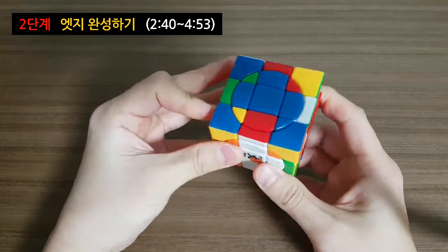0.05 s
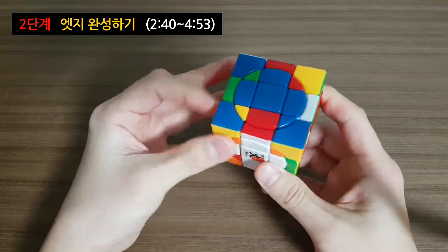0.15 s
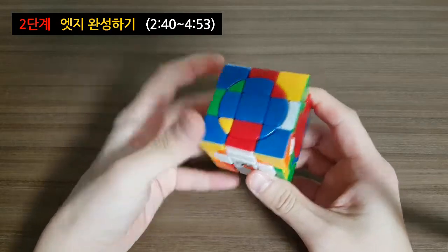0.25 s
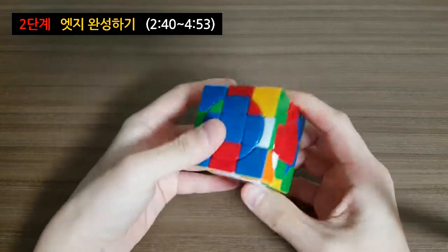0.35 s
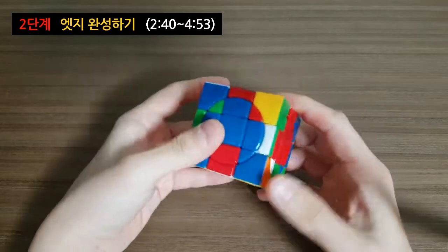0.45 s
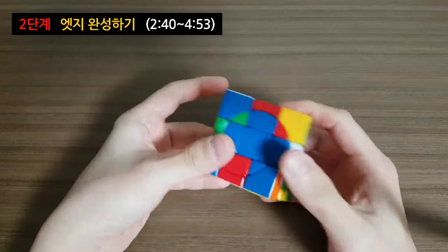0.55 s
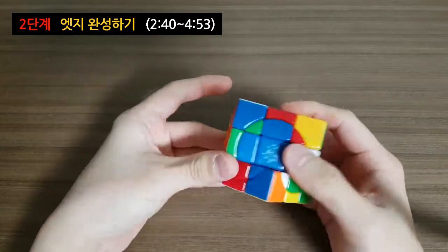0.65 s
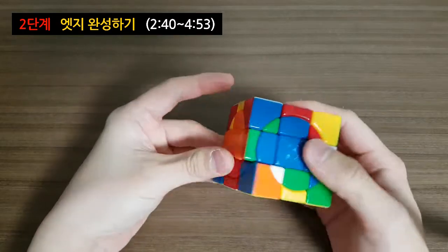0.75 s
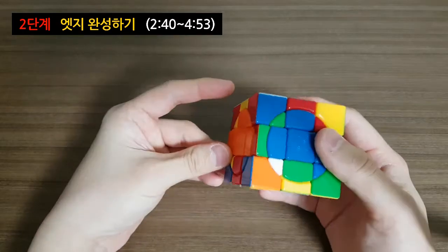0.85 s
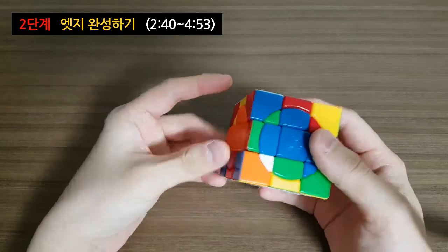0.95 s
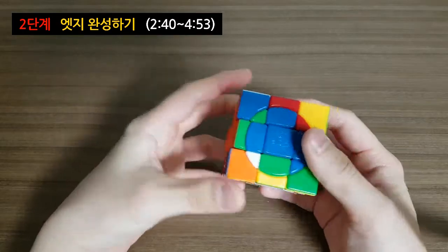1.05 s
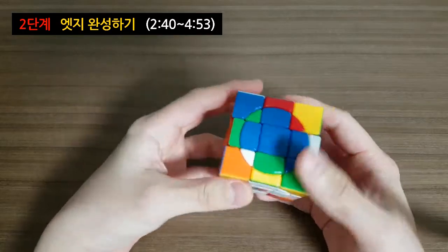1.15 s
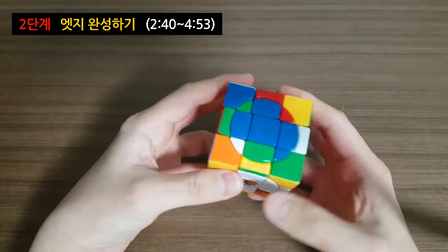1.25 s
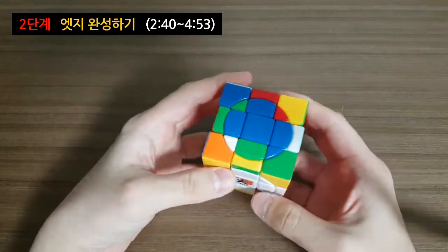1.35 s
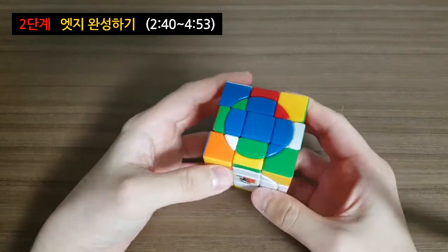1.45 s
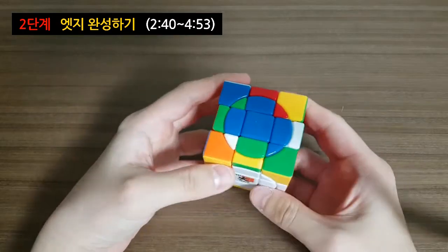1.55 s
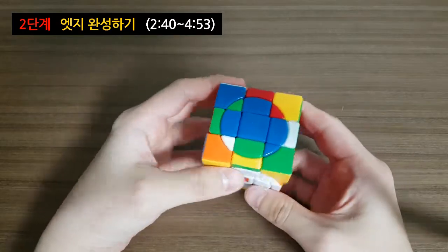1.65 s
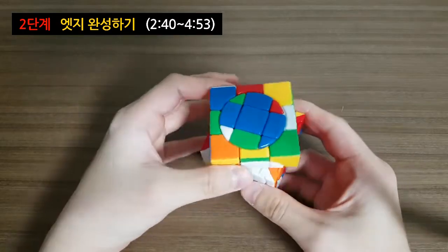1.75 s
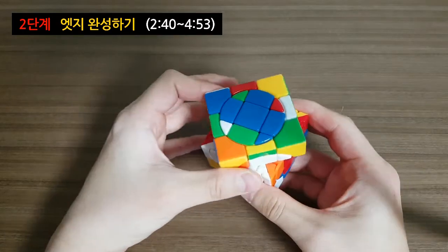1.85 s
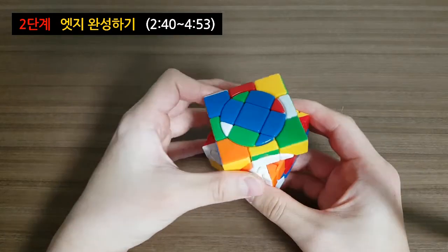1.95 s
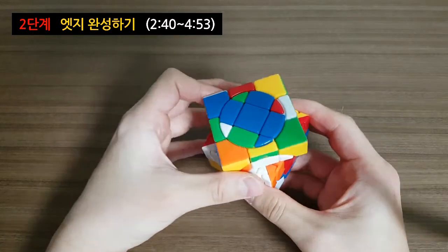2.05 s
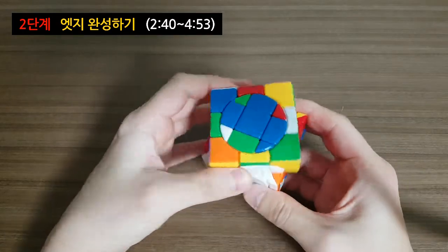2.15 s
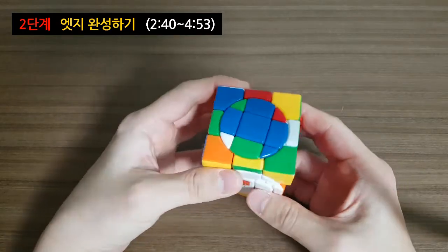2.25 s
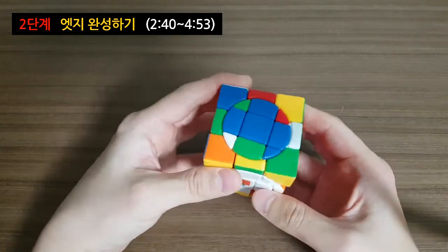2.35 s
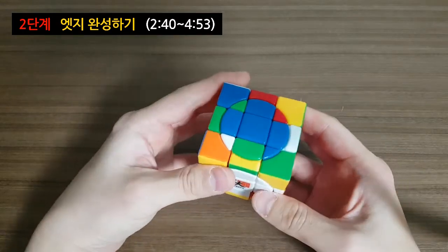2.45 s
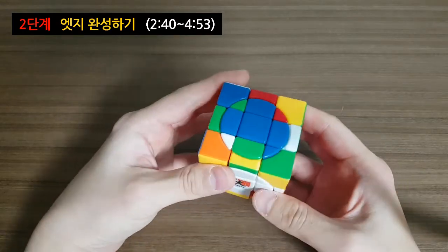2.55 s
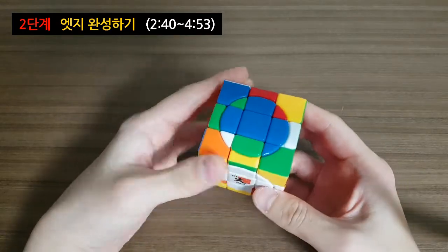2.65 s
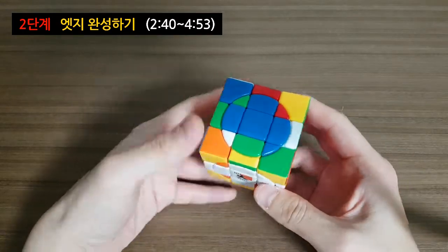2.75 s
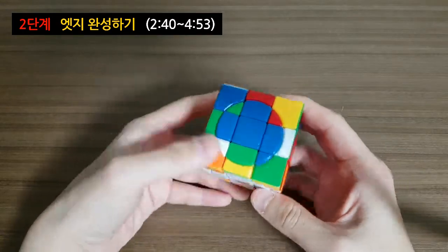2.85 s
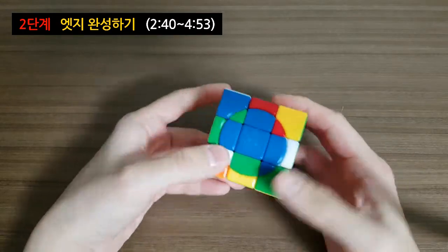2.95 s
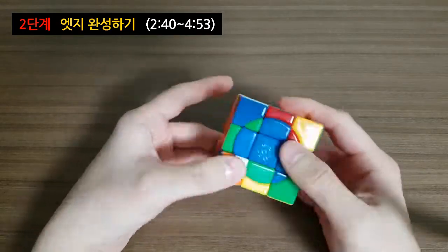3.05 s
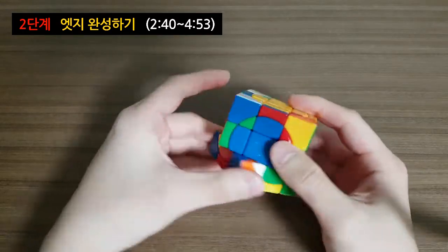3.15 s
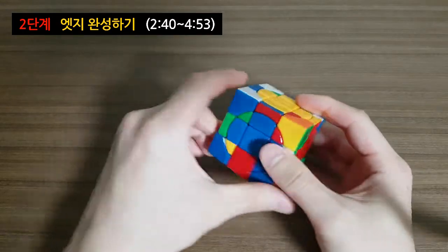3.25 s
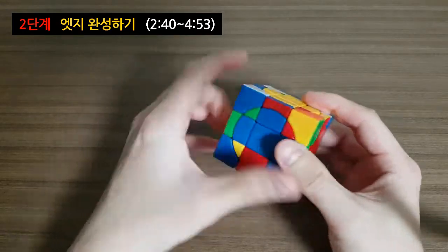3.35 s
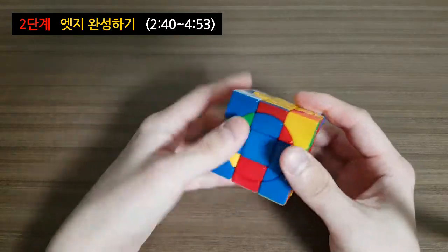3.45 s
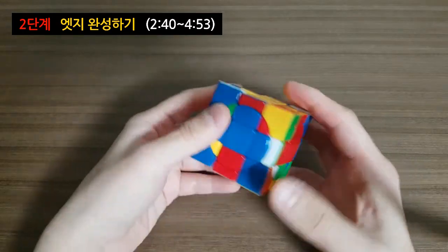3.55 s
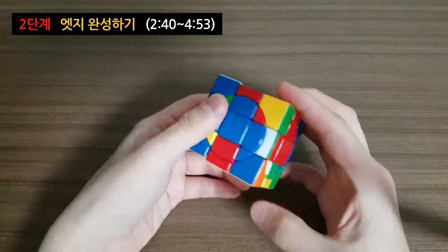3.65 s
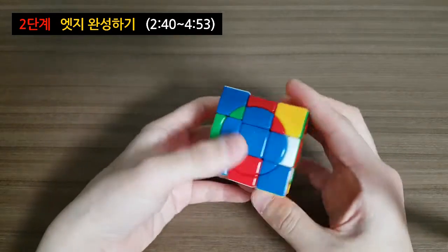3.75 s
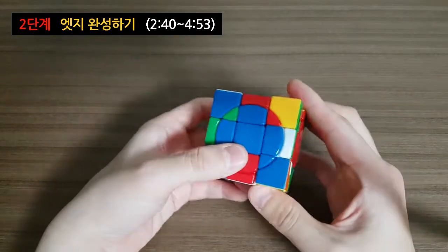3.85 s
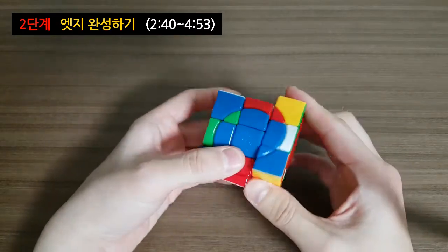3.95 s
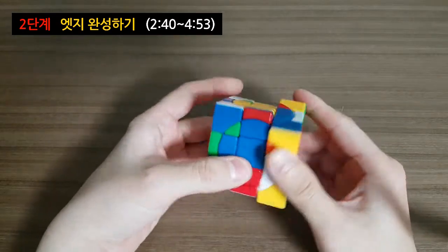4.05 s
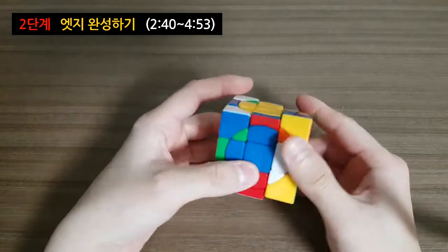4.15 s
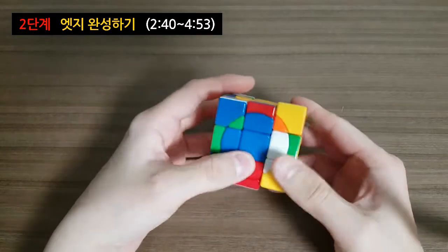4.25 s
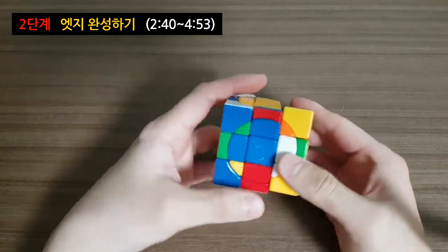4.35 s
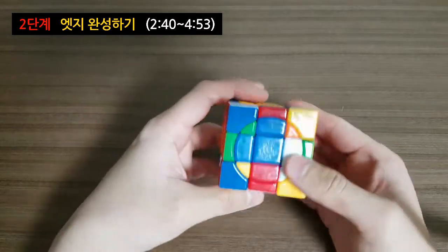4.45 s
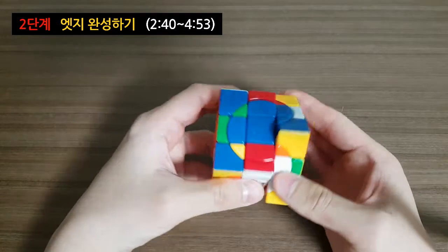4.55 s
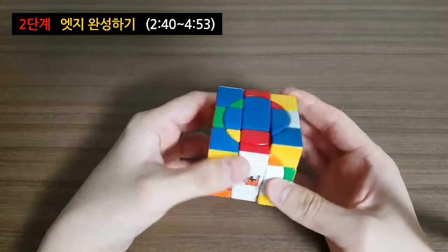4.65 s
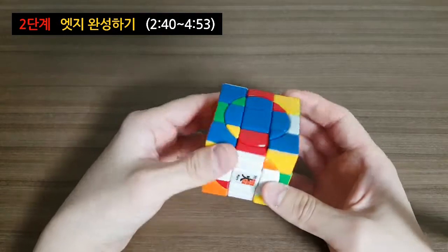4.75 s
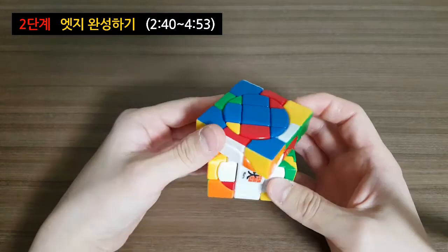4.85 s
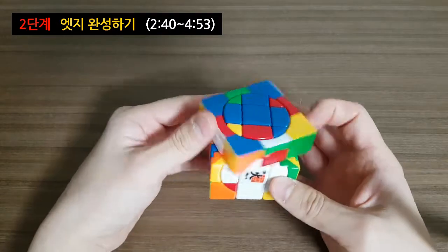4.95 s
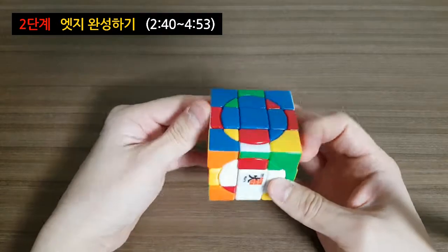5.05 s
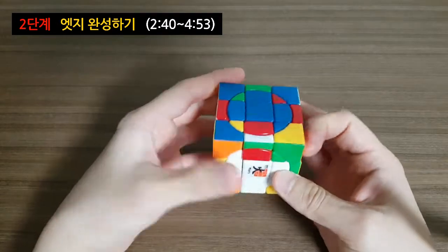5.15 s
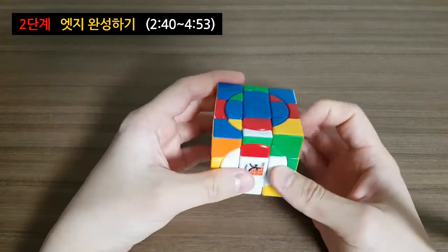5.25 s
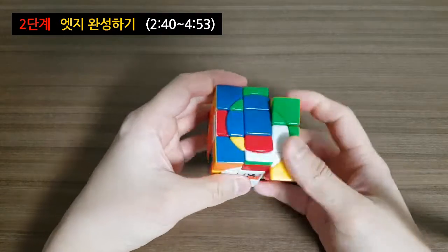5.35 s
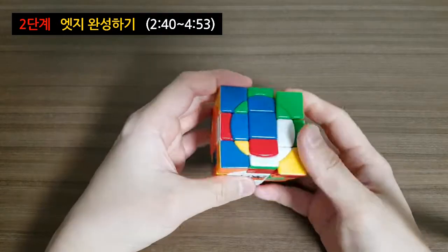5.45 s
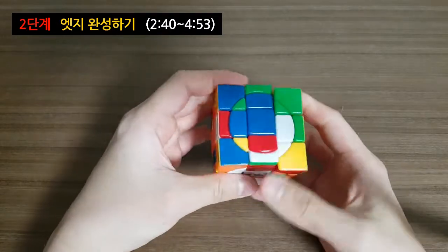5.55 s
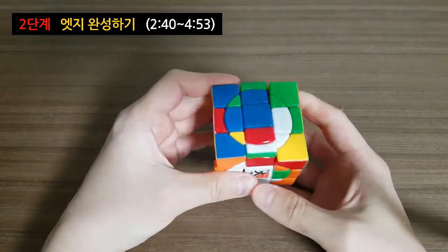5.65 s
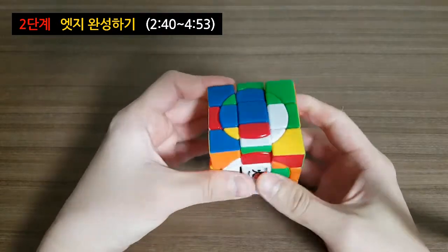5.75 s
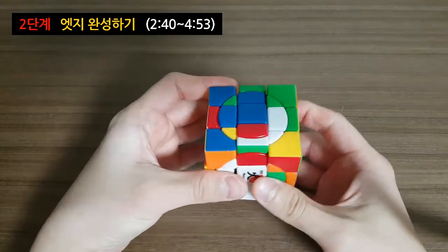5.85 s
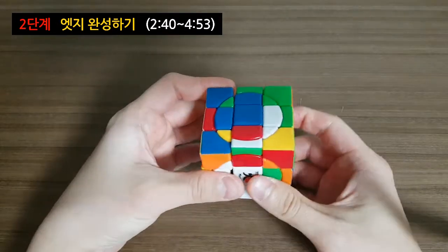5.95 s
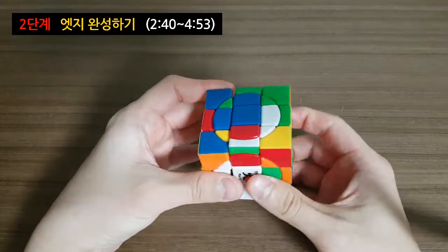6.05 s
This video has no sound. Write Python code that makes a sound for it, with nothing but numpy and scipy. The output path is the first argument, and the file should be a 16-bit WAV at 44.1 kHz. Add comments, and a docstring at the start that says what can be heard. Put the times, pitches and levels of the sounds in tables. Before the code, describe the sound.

In a quiet room with a faint low hum, a plastic puzzle cube is twisted in uneven bursts, heard close up in stereo. Each turn gives a dry, gritty scrape and a cluster of hollow clicks. The turning pauses briefly, resumes sparsely, then grows quick and louder before easing into light clicks. Soft, low wrist bumps on the wooden table accompany the handling.

```python
"""Hands turn a hollow plastic puzzle cube over a wooden table, close to two microphones; a quiet room hums.
From the start, layers scrape round, pieces catch in short rattling snaps and wrists bump the table.
A lull after one second gives way to scattered turns, then to a busy run from 3 s, with a thin high ping
at 3.2 s and the hardest snap at 4.8 s. The last turns are softer, and a layer squeaks once near the end."""
import sys
import numpy as np
from scipy import signal
from scipy.io import wavfile
from scipy.ndimage import uniform_filter1d

SR = 44100
rng = np.random.default_rng(int(sys.argv[2]) if len(sys.argv) > 2 else 0)


def materialize(psi):
    """Save the field psi as 16-bit PCM at rate SR to the path in sys.argv[1].

    A 1-D psi becomes a single channel; in a 2-D psi each row is a channel.
    """
    bounded = np.clip(np.atleast_2d(psi).T, -1, 1)
    quanta = np.round(bounded * 32767).astype(np.int16)
    wavfile.write(sys.argv[1], SR, quanta)


N = 269010
LEAD_IN = 500  # samples of a snap ahead of its cue
BITE_FROM_DB = -35  # snaps harder than this get brighter

# The cube's modes: hollow body, plastic shell, ticking edges. Columns: pitch_hz, level_db, t60_s
HOLLOW_MODES = [(790, -6, 0.016), (870, 5, 0.014), (945, 6, 0.014), (1060, 0, 0.018), (1260, -6, 0.022)]
SHELL_MODES = [(1390, -3.5, 0.0075), (1833, 4.5, 0.0084), (2144, -3.5, 0.014), (2528, 1, 0.0097),
               (2727, 4, 0.0065), (3020, -4, 0.0079), (3476, -9, 0.017), (3890, -0.5, 0.0057),
               (4524, -3.5, 0.0077)]
EDGE_MODES = [(5770, 3, 0.0023), (7700, 3, 0.0013), (9050, 5, 0.0006), (11620, 4, 0.0011),
              (13950, -11, 0.0073), (14500, -3, 0.0044)]


def gain_of(db):
    return 10 ** (np.asarray(db) / 20)


def unit_rms(x):
    return x / np.sqrt(np.mean(x ** 2) + 1e-20)


def unit_peak(sound):
    """Scale a stereo hit so that its loudest 2 ms have an rms of 1."""
    return sound / np.sqrt(uniform_filter1d((sound ** 2).mean(0), 100).max())


def curve_at(points, hz):
    """Read a curve along a log-frequency axis."""
    point_hz, value = np.transpose(points)
    return np.interp(np.log(hz + 1), np.log(point_hz + 1), value)


def add(mix, start_s, sound):
    """Lay a sound into the mix, trimming any overhang."""
    at = round(start_s * SR)
    sound = sound[:, max(-at, 0):]
    part = mix[:, max(at, 0):][:, :sound.shape[1]]
    part += sound[:, :part.shape[1]]


def drift(hz):
    """A random wander of rms 1, moving at rates up to about hz."""
    return unit_rms(np.interp(np.arange(N) / SR, np.arange(2000) / (2 * hz), rng.standard_normal(2000)))


def stereo_spectra(left, other, likeness, hz):
    """Blend two independent spectra into a pair that is as alike as the curve says."""
    same = np.clip(curve_at(likeness, hz), 0, 1)[:, None]
    return np.array([left, same * left + np.sqrt(1 - same ** 2) * other])


def room_tone():
    """Smooth room and microphone noise, alike on both sides only in the bass."""
    colour = [(15, -56), (25, -22), (37, -6), (85, -5.5), (174, -15.5), (205, -10), (307, -11.5),
              (602, -17.5), (688, -14.5), (767, -27.5), (1500, -19), (2450, -18.5), (3100, -25.5),
              (6810, -36.5), (15700, -31.5)]  # noise spectrum: frequency_hz, relative_density_db
    likeness = [(60, 0.67), (130, 0.19), (300, 0.12), (15000, 0.0064)]  # left-right match: frequency_hz, likeness (0-1)
    frames, hz = N // 1024 + 5, np.fft.rfftfreq(4096, 1 / SR)
    a, b, c, d = rng.standard_normal((frames, 2049, 4)).T
    spectra = stereo_spectra(a + 1j * b, c + 1j * d, likeness, hz) * gain_of(curve_at(colour, hz))[:, None]
    noise = signal.istft(spectra, nperseg=4096, noverlap=3072)[1][:, :N]
    return gain_of([[-66.1], [-64.9]]) * unit_rms(noise)


def hum(pitch_hz=53.4, level_db=-67.5):
    """A low tone whose level and pitch waver a little."""
    cycles = np.cumsum(pitch_hz * (1 + 0.01 * drift(3.2))) / SR
    return gain_of(level_db + 2.6 * drift(4.5) + np.array([[-.6], [.6]])) * np.sin(2 * np.pi * cycles)


def reflections(sound):
    """Sparse wall echoes of random sign, each band dying at its own speed."""
    decay = [(500, 0.4), (1200, 0.27), (2500, 0.22), (6000, 0.28), (15000, 0.22)]  # room decay: frequency_hz, t60_s
    likeness = [(500, 0.74), (1400, 0.039), (3000, 0.023)]  # left-right match of the echoes: frequency_hz, likeness (0-1)
    taps = np.zeros((2, SR // 2))
    at = np.arange(100, SR // 2 - 20, 20) + rng.integers(0, 20, (2, (SR // 2 - 101) // 20))
    np.put_along_axis(taps, at, rng.choice([-1., 1.], at.shape), 1)
    hz, t, spectra = signal.stft(taps, SR, nperseg=256)
    fade = gain_of(-60 * t / curve_at(decay, hz)[:, None])
    tail = signal.istft(stereo_spectra(*spectra, likeness, hz) * fade, SR, nperseg=256)[1]
    return signal.fftconvolve(sound, tail / np.linalg.norm(tail[0]), axes=1)[:, :N]


def table_tremor(slide_db):
    """The working hands pass a low tremor through the arms into the table."""
    band = signal.butter(2, [75, 140], "band", fs=SR, output="sos")
    tremor = unit_rms(signal.sosfilt(band, rng.standard_normal(N)))
    return gain_of(-62.5 + .5 * (slide_db + 43.5) + np.array([[-1.3], [1.3]])) * tremor


def wrist_bumps():
    """Soft pushes: each swings the table top a few times in its lowest modes."""
    bumps = [(0.384, -65, 9), (0.616, -45.5, -2.5), (0.882, -53.5, 4.5), (2.896, -47.5, -5.5),
             (3.102, -47, -6), (3.207, -71, -3), (3.522, -43, -6.5), (3.963, -47, 0), (4.441, -44, -1.5),
             (4.514, -55, 14), (4.84, -46, 0.5), (5.277, -44, -3.5), (5.787, -48, -3)]  # wrists landing: start_s, level_db, upper_db (relative to the lowest mode)
    table_modes = [(87, 0.21), (125, 0.15), (230, 0.052)]  # wooden top: pitch_hz, t60_s
    t = np.arange(8000) / SR
    lower, upper, thud = (np.sin(2 * np.pi * hz * t) * gain_of(-60 * t / t60) for hz, t60 in table_modes)
    attack = 1 - np.exp(-t / 0.0094)
    track = np.zeros((2, N))
    for start_s, level_db, upper_db in bumps:
        swing = attack * (lower + gain_of(upper_db) * (upper + gain_of(-1.5) * thud))
        add(track, start_s, gain_of(level_db + np.array([[-1.3], [1.3]])) * swing)
    return track


def ring(modes, likeness, places, detune=0.024, spread_db=3):
    """Stereo rings of the cube struck at several places, each with its own tuning and balance of modes."""
    balance = [(200, -5), (700, -5), (1290, 6), (2400, -6), (4400, -4), (8100, 11), (15000, 2)]  # how the microphones differ: frequency_hz, left_minus_right_db
    hz, db, t60 = np.transpose(modes)[:, :, None]
    t = np.arange(700) / SR
    tune, size, sign, left_phase, right_phase = rng.standard_normal((5, places, len(modes), 1))
    hz = hz * (1 + detune * (0.5 * tune[0] + tune))  # the places share part of their tuning
    pan_db = curve_at(balance, hz) / 2
    width = (1 - likeness) * np.pi
    attack = 1 - np.exp(-hz * t * 2)
    envelope = np.sign(sign) * attack * gain_of(db + spread_db * size - 60 * t / t60)
    phase = 2 * np.pi * hz * t
    lag = 2 * np.pi * hz * 4 / SR  # the right microphone is a little further away
    left = envelope * gain_of(pan_db) * np.sin(phase + width * left_phase)
    right = envelope * gain_of(-pan_db) * np.sin(phase + width * right_phase - lag)
    return np.array([left.sum(1), right.sum(1)])


def slide_level():
    """Sliding level in dB: each stroke swells to its hardest push and fades, and the strongest wins."""
    strokes = [(0.0, -60, 900, 177.5), (0.382, -61.5, 170, 94), (0.55, -53, 740, 79),
               (0.718, -43, 229, 280), (0.82, -58.5, 100, 88), (1.153, -64.5, 478, 190),
               (1.589, -63, 500, 40), (1.676, -48, 1300, 177), (1.853, -56, 470, 169),
               (2.171, -53, 257, 106), (2.392, -61, 352, 107), (2.66, -57.5, 1000, 299),
               (2.96, -65, 54, 70), (3.12, -48, 530, 57), (3.25, -42.5, 162, 135), (3.523, -62, 1500, 221),
               (3.572, -58, 300, 183), (3.776, -63.5, 145, 99), (3.846, -59, 700, 25),
               (3.966, -47.5, 500, 229), (4.055, -41, 516, 123), (4.446, -62, 1200, 214),
               (4.518, -43.5, 740, 87), (4.639, -47, 75, 157), (4.842, -45, 498, 87), (5.044, -47, 70, 161),
               (5.282, -51, 502, 120), (5.354, -41, 348, 118), (5.87, -65, 90, 77), (5.994, -56, 400, 354)]  # layer turns: peak_s, level_db, swell_db_per_s, fade_db_per_s
    t = np.arange(0, N + 32, 32) / SR
    slide_db = -78  # fingers shifting between strokes
    for peak_s, level_db, swell, fade in strokes:
        slide_db = np.maximum(slide_db, level_db - np.maximum(swell * (peak_s - t), fade * (t - peak_s)))
    return np.interp(np.arange(N) / SR, t, slide_db)


def scrape(slide_db, catches_per_s=2500, places=12):
    """Dense, tiny, uneven catches ring the cube at several places; harder sliding is brighter."""
    size_db = 0.68 * np.minimum(rng.exponential(1, N), 5) + 3.2 * drift(80)
    catches = gain_of(size_db) * (rng.random(N) < catches_per_s / SR)
    place = rng.integers(0, places, N)
    hollow = gain_of(-1) * ring(HOLLOW_MODES, 0.88, places, detune=0.057)
    body = hollow + ring(SHELL_MODES, 0.59, places)
    rings = np.concatenate([body, ring(EDGE_MODES, 0.56, places)])
    grit = sum(signal.oaconvolve((catches * (place == k))[None], rings[:, k], axes=1)[:, :N]
               for k in range(places))
    edge_db = -9.5 + 0.22 * (slide_db + 37.5)
    return gain_of(slide_db) * (unit_rms(grit[:2]) + gain_of(edge_db) * unit_rms(grit[2:]))


def chatter(slide_db, catches_per_s=120, pieces=8):
    """Further snaps, like the listed ones, catch at random times, about 6 dB under the sliding level."""
    catch_db = slide_db - 6 + 2 * rng.standard_normal(N)
    catches = gain_of(catch_db - BITE_FROM_DB) * (rng.random(N) < catches_per_s / SR)
    piece = rng.integers(0, pieces, N)
    track = np.zeros((2, N))
    for k in range(pieces):
        click = snap(BITE_FROM_DB, hollow_db=-5, tick_db=-0.5, rattle_ms=3.1)
        track += signal.oaconvolve((catches * (piece == k))[None], click, axes=1)[:, LEAD_IN:N + LEAD_IN]
    return track


def squeak(length_s, pitch_hz, level_db):
    """A layer sticks and slips fast and evenly: a brief tone with weaker overtones."""
    t = np.arange(0, length_s, 1 / SR)
    waver = .15 * uniform_filter1d(rng.standard_normal(len(t)), 60)
    cycles = np.cumsum(pitch_hz * (1 + waver)) / SR
    tone = sum(gain_of(-12 * k) * np.sin(2 * np.pi * (k + 1) * cycles) for k in range(4))
    return gain_of(level_db + np.array([[-2.5], [2.5]])) * np.sqrt(np.sin(np.pi * t / length_s)) * tone


def edge_pings():
    """A thin edge gives short, very high rings, each with two quick rebounds."""
    pings = [(1.877, -54), (2.199, -57), (3.216, -40), (3.2355, -20), (3.259, -43)]  # hits on the edge: start_s, level_db
    thin_modes = [(13200, -4, .003), (13900, 0, .0045), (14300, 1, .0045), (15300, -2, .003)]  # its ring: pitch_hz, level_db, t60_s
    track = np.zeros((2, N))
    for start_s, level_db in pings:
        hits = np.zeros(300)
        hits[[0, *rng.integers(30, 300, 2)]] = 1, .6, .4
        edge = ring(thin_modes, likeness=.6, places=2, detune=.01).sum(1)
        add(track, start_s, gain_of(level_db) * unit_peak(signal.fftconvolve(edge, hits[None], axes=1)))
    return track


def snap(shell_db, hollow_db, tick_db, rattle_ms):
    """A swelling and fading cluster of knocks as neighbouring pieces land one after another."""
    when, size = rng.random((2, 4, 10))  # ten knocks at each of four places
    when = 2.2 * when - .7  # in rattle lengths; weak knocks lead in
    at = (LEAD_IN + when * rattle_ms * SR / 1000).astype(int).clip(0, 1599)
    contour_db = np.minimum(24 * (when - .3), -13 * (when - .3))
    knocks = np.zeros((4, 1600))
    np.put_along_axis(knocks, at, (0.15 + size ** 2) * gain_of(contour_db), 1)
    bite_db = .9 * max(shell_db - BITE_FROM_DB, 0)  # hard blows wake the upper shell modes
    shell = [(hz, db + bite_db * (hz > 2400), t60) for hz, db, t60 in SHELL_MODES]
    parts = (HOLLOW_MODES, .95, hollow_db), (shell, .8, 0), (EDGE_MODES, .5, tick_db)
    sound = 0
    for modes, likeness, part_db in parts:
        part = signal.fftconvolve(ring(modes, likeness, places=4), knocks[None], axes=2).sum(1)
        sound = sound + gain_of(part_db) * unit_peak(part)
    pan_db = rng.normal(0, 1.5) * np.array([[1], [-1]])
    return gain_of(shell_db + pan_db) * sound


def piece_snaps():
    """Pieces catch and snap home as the layers turn."""
    # Snaps: cue_s, shell_db, hollow_db and tick_db (both relative to the shell), rattle_ms
    snaps = [(0.0046, -50, -1.5, -5.5, 4.35), (0.1752, -56, -7, -14, 7), (0.2037, -50.5, -16, -19, 2.35),
             (0.213, -61, -2, -11, 3.3), (0.332, -52, -5.5, -12, 2.26), (0.357, -43, -5, -14, 2.8),
             (0.3705, -47, -12, -14, 4.2), (0.3824, -39.5, -5.5, -2.5, 3.46),
             (0.3915, -51.5, -11, -1.5, 3.4), (0.4923, -52, -2.5, -10.5, 4.1), (0.5384, -41, 5.5, -8, 9.5),
             (0.561, -42, -0.5, -2.5, 7), (0.6536, -50, 2, -12, 7), (0.6946, -40, -6, 0.5, 5.2),
             (0.7064, -43, -0.5, -6, 11.7), (0.718, -36, -4, -8, 4.7), (0.7964, -40, -4, -6, 4.1),
             (0.8316, -36.5, -6.5, -30, 2.48), (0.8396, -39, -1.5, 0.5, 4.6), (0.8694, -42, -11, -13, 3.44),
             (1.012, -61, -10, -12, 5.7), (1.1461, -52, -22, -3.5, 5.4), (1.582, -40.5, -11, -11, 6.6),
             (1.6652, -34, -3, -10, 4.1), (1.6744, -42.5, -2, -17, 8.1), (1.724, -43.5, -2, -9.5, 9.7),
             (1.8382, -47.5, -26, -12, 3.2), (1.8775, -53.5, -11, -6, 5), (2.1048, -44, -6, -9, 8.8),
             (2.1583, -48.5, -2, -23, 5.3), (2.1745, -46, 1, -27, 6), (2.2, -60, 11, 4, 4),
             (2.25, -58, 4, -15, 5), (2.285, -50, -5.5, -30, 4.8), (2.3848, -45, -5, -11, 5.94),
             (2.645, -47, -2.5, -10.5, 5.3), (2.9501, -51.5, -6.5, -1.5, 8.1), (2.996, -58.5, 4, -13, 3.2),
             (3.1067, -47, -7.5, -7, 14.4), (3.127, -44, 1.5, -16, 7.5), (3.1936, -41, -0.5, -25, 4.8),
             (3.215, -40, 3.5, -3, 4.6), (3.235, -29, -9.5, -2.5, 3.84), (3.258, -35, -3.5, -6, 9.7),
             (3.2784, -47.5, 9.5, -3, 5.8), (3.295, -42.5, -1.5, -4, 12.8), (3.5172, -42, -4.5, -4.5, 7.3),
             (3.556, -46.5, -9.5, -11, 5.3), (3.5672, -44.5, -6, -9, 4.5), (3.7691, -43, -6.5, -6, 3.7),
             (3.8379, -46, -14, -7, 7.8), (3.8484, -42.5, 8.5, -1, 3.67), (3.953, -44.5, -12, -5, 5.2),
             (3.9733, -36, -3.5, -3, 9), (4.0428, -36, -14, -2.5, 6.3), (4.063, -38, -3, 2.5, 3.4),
             (4.0893, -37, -3, -4.5, 7.3), (4.1079, -43, 4, -2.5, 7.9), (4.137, -41, -4, -6, 10.1),
             (4.1661, -36.5, -1.5, -5, 6.4), (4.436, -42.5, -14, -18, 3), (4.4944, -67.5, -9, 0, 8.4),
             (4.5142, -42, 2, -14, 7.3), (4.5303, -38.5, -0.5, -19, 6.2), (4.559, -44, -4, -23, 14.5),
             (4.585, -42, -9, -18, 6.3), (4.6306, -43, -4, -6.5, 8.7), (4.7436, -44.5, -6, -17, 4.6),
             (4.765, -43, 3, -4.5, 4.9), (4.8346, -23.5, -4.5, -19, 3.09), (4.8379, -26, -4, 0, 5.67),
             (4.9749, -38.5, 1, -0.5, 3.4), (5.001, -34, -6, -11, 3.9), (5.0257, -37.5, -2, -6, 9.5),
             (5.0482, -38.5, -1.5, -13, 5.3), (5.084, -49, -1, -7, 4), (5.2716, -40, -3, -4, 5.8),
             (5.2805, -37, 2, -5, 8.4), (5.34, -33.5, -8, -6, 11), (5.3469, -35, 6.5, -6, 4.75),
             (5.3605, -34, -4, -4, 6.2), (5.3718, -35.5, -0.5, -0.5, 4.35), (5.39, -33, -6, -5.5, 8.8),
             (5.526, -53, 1, -16, 4), (5.581, -46.5, 2.5, -11.5, 4.2), (5.609, -57, 3, -10, 4.8),
             (5.6487, -53, 5, -15, 3.14), (5.7462, -55, -2.5, -8.5, 9.3), (5.801, -49.5, 0.5, -10.5, 4.1),
             (5.8561, -49, -5.5, -11, 4.1), (5.9124, -45, -2.5, -11.5, 7.6), (5.9535, -53, 0, -18, 3.2),
             (5.976, -46, -3.5, -12, 4.7), (5.989, -45.5, -1.5, -11, 6.4)]
    track = np.zeros((2, N))
    for cue_s, *settings in snaps:
        add(track, cue_s - LEAD_IN / SR, snap(*settings))
    return track


def scene():
    """The cube and its reflections over table thumps, room tone and hum."""
    accents = piece_snaps() + edge_pings()
    add(accents, 5.862, squeak(length_s=.026, pitch_hz=2600, level_db=-59))
    bumps = wrist_bumps()
    slide_db = slide_level()
    low_cut = signal.butter(1, 500, "high", fs=SR, output="sos")  # a small body radiates little bass
    cube = signal.sosfilt(low_cut, accents + scrape(slide_db) + chatter(slide_db))
    return cube + gain_of(-8) * reflections(cube) + bumps + table_tremor(slide_db) + room_tone() + hum()


def record(dry):
    """A steep high cut and a small constant offset."""
    high_cut = signal.firwin(511, 15900, window=("kaiser", 9), fs=SR)
    return signal.oaconvolve(dry, high_cut[None], "same") - .0005


dry = scene()
out = record(dry)
materialize(out)
```